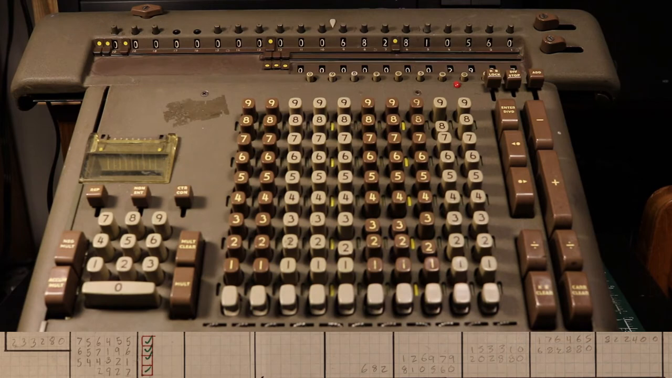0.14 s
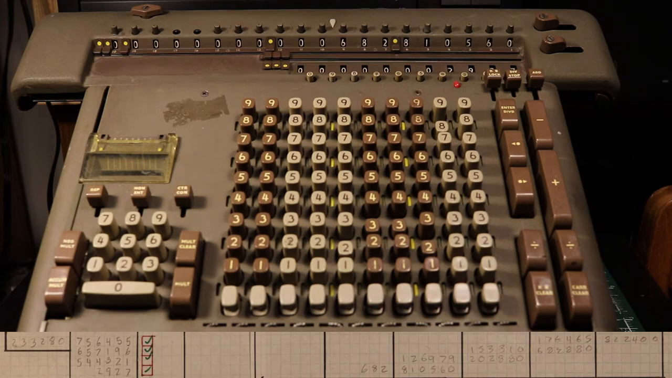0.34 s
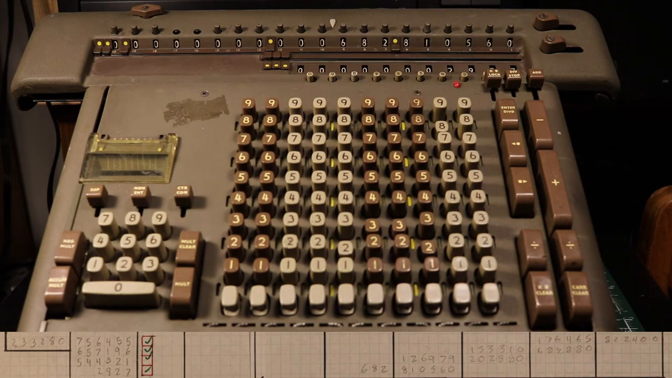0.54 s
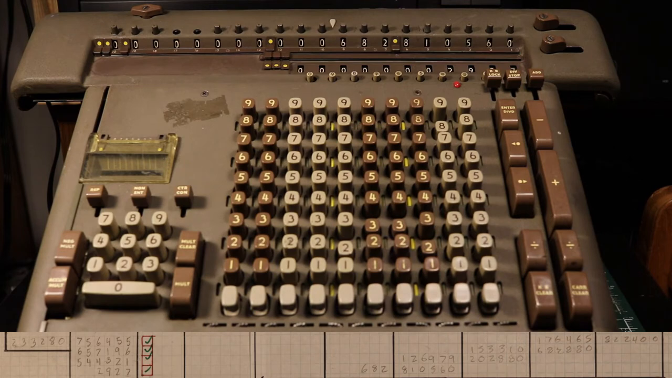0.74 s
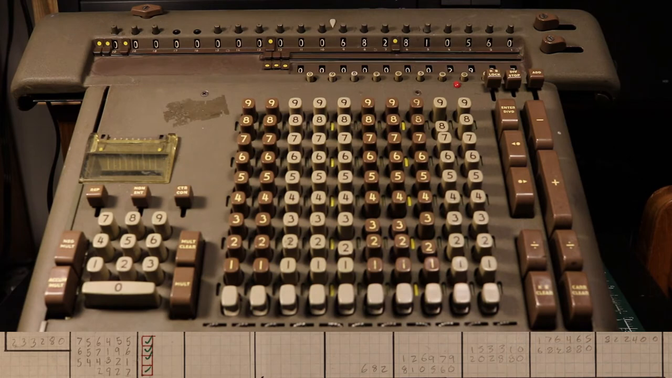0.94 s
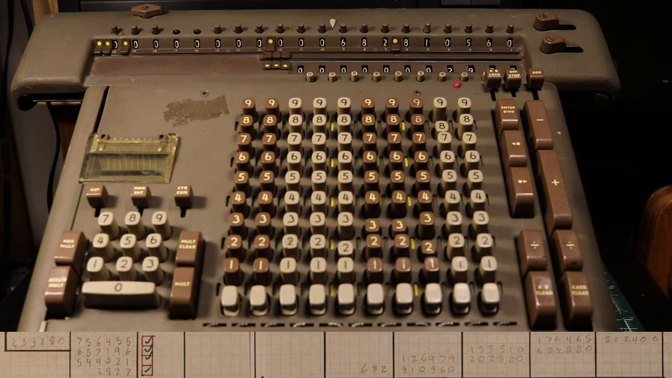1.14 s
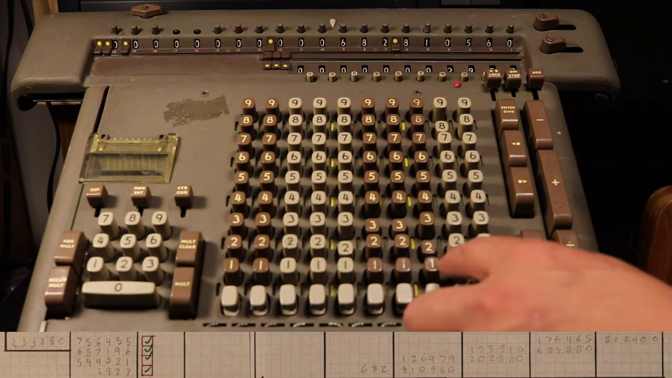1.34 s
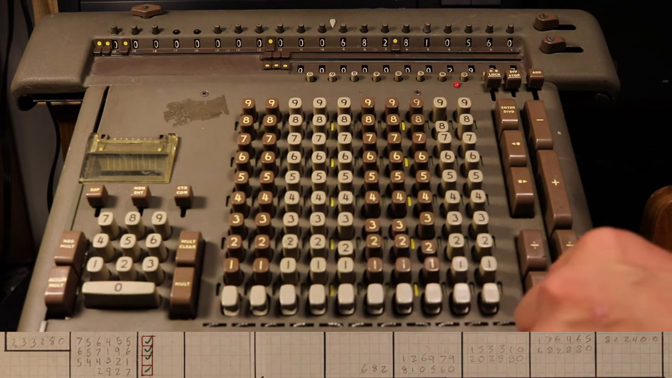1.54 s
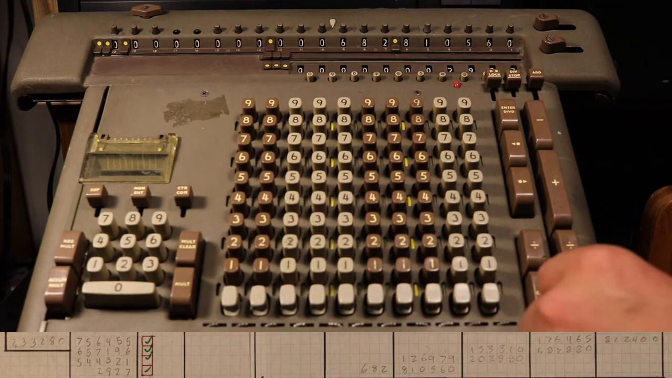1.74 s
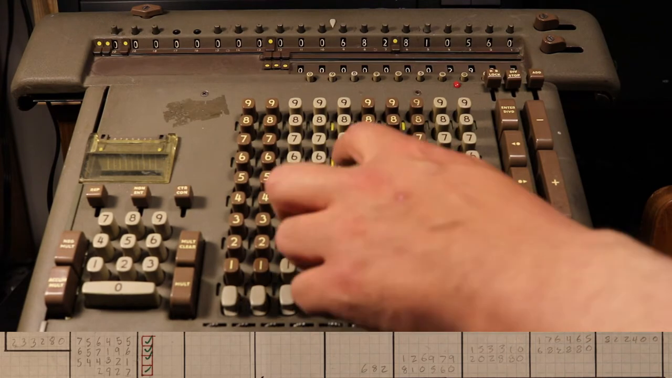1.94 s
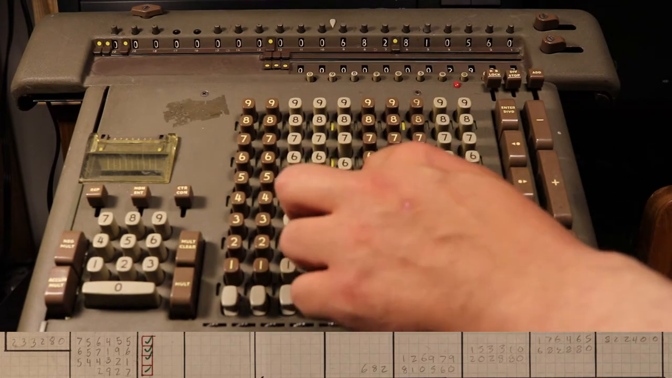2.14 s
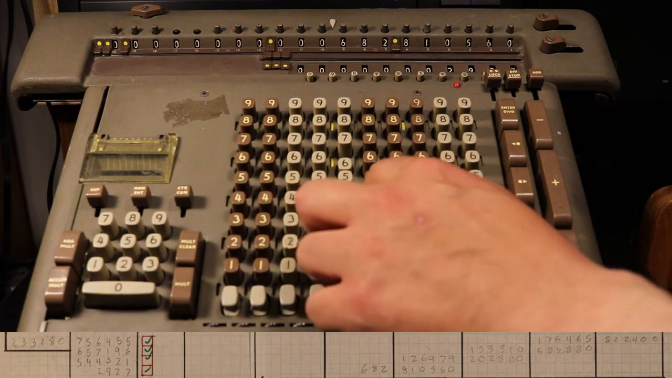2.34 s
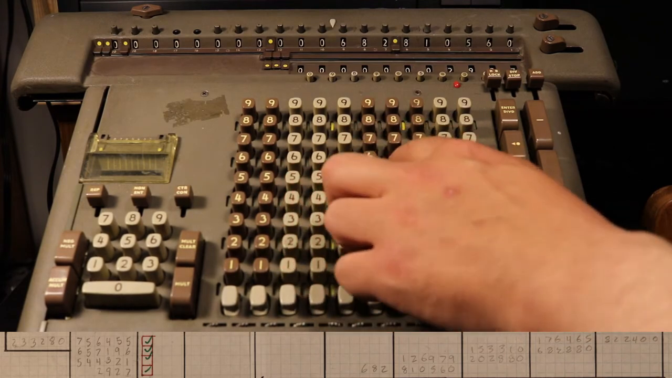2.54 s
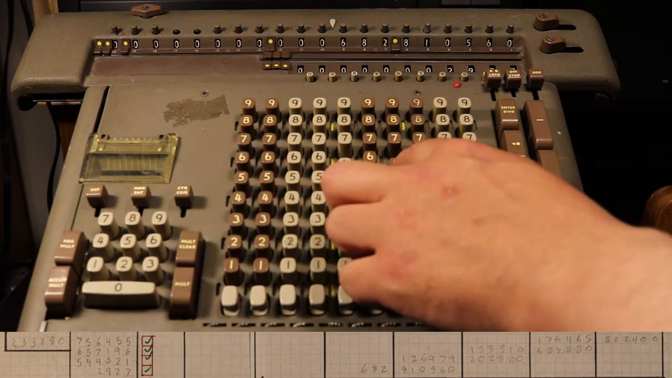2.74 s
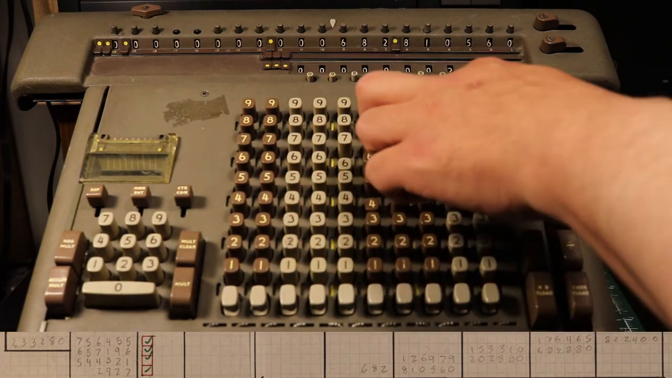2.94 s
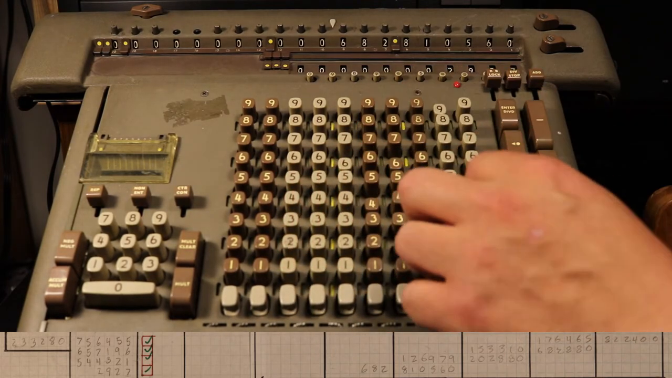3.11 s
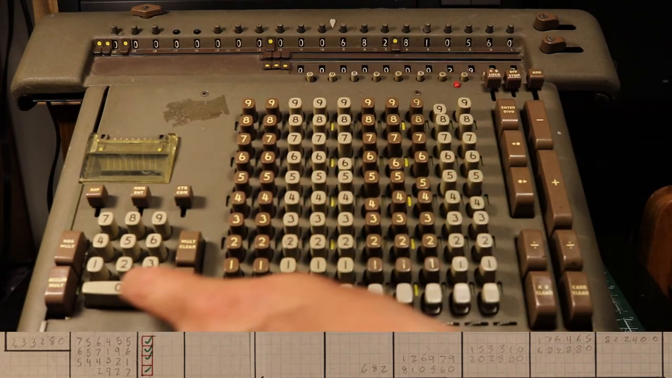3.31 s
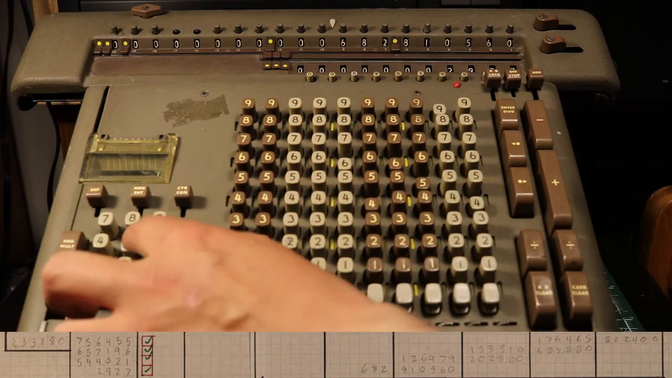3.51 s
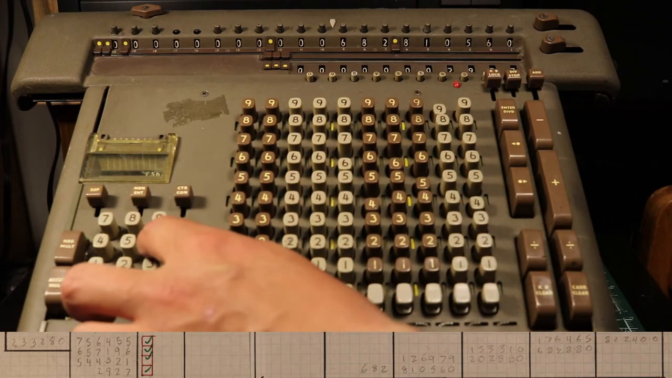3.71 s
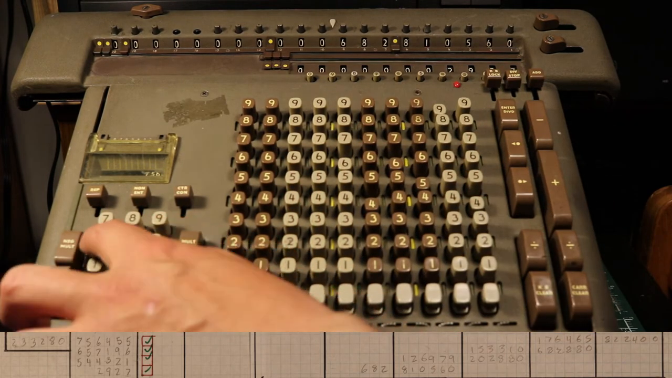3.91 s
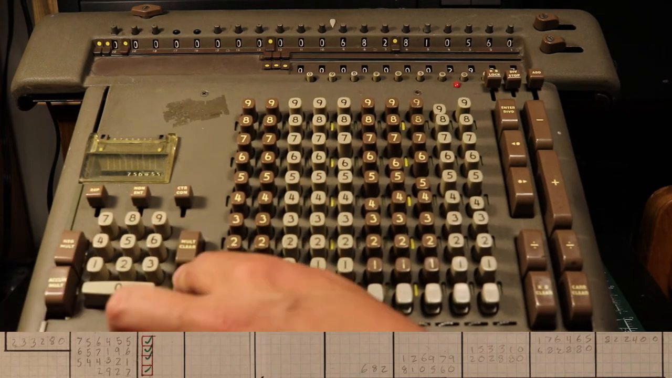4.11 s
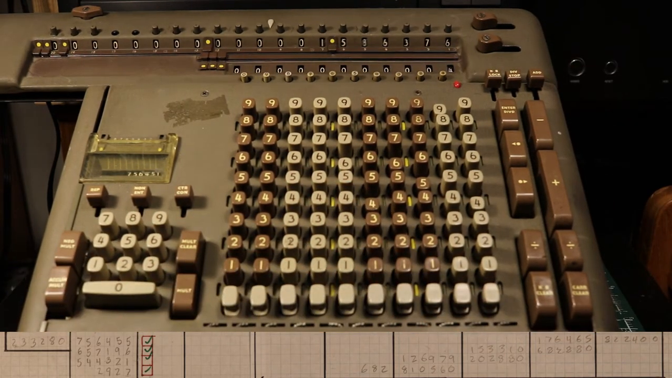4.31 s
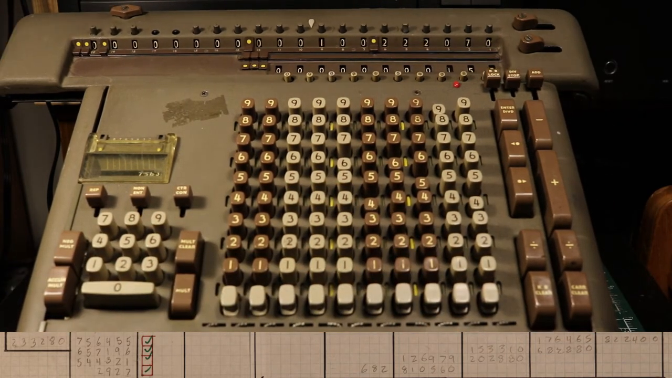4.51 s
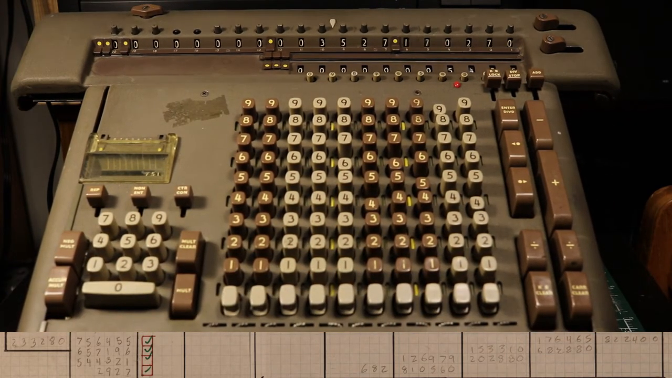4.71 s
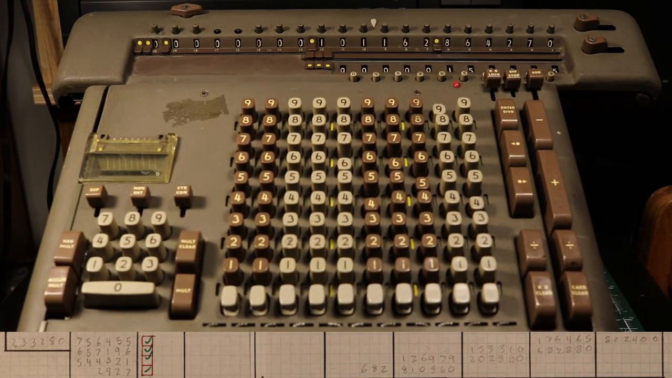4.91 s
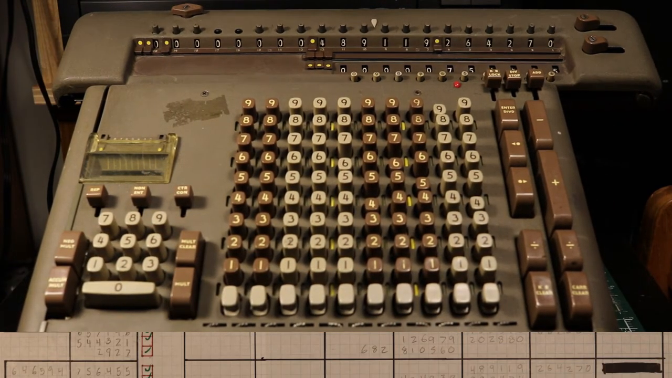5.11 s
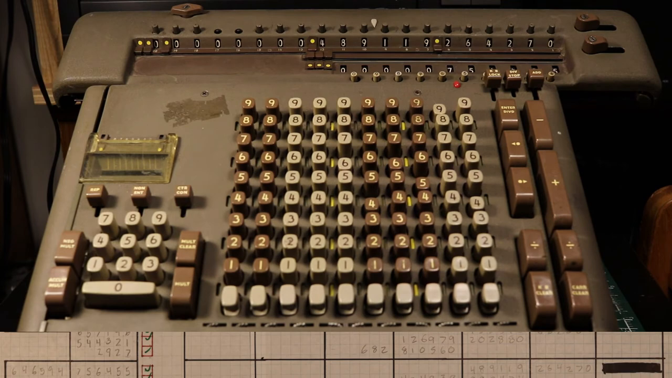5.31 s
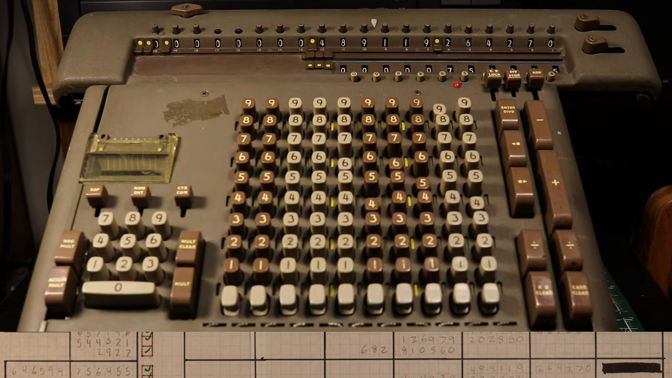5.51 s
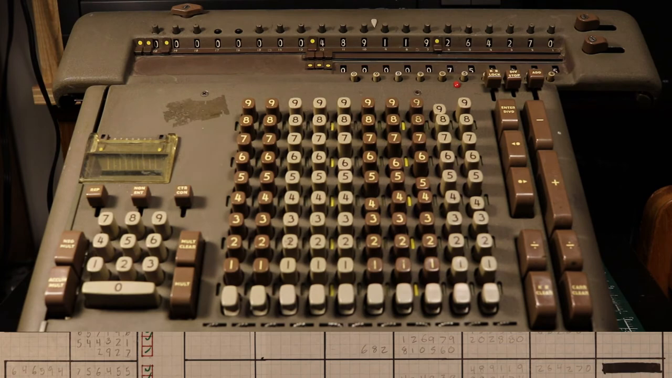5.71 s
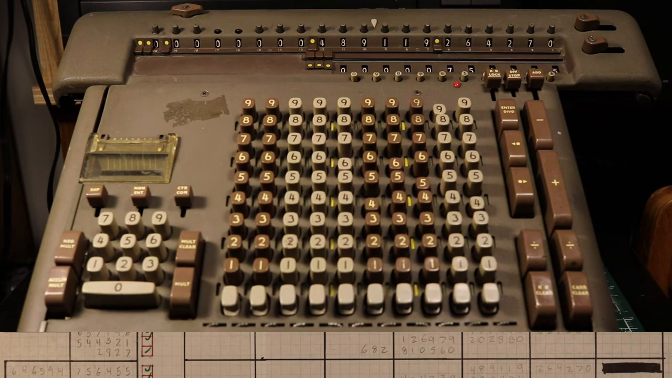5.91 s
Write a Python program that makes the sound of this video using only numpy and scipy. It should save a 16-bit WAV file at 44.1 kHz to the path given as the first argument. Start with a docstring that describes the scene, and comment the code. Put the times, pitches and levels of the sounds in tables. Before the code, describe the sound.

Quiet hum, then a sharp clear-key clack, scattered key clicks and hollow taps, and a one-second loud rattling burst of a motorized mechanical calculator that stops dead.

```python
"""A motor-driven mechanical calculator on a desk, close by: its drive runs for a second, pawls chattering on
every turn, gears whining, while cams throw a round of levers for each digit. Before that a clear key and six
digit keys click and the multiplier pad is tapped six times. Pawls and contacts are impulses and dying noise
shaped by spectra, small steel parts are damped sines, the gears are wavering sines.
A gently wavering hum, low rumble, hiss and faint rustles fill the small room."""
import sys
import numpy as np
from scipy import signal
from scipy.fft import rfft, irfft, next_fast_len
from scipy.io import wavfile
from scipy.ndimage import map_coordinates

SR = 44100
rng = np.random.default_rng(int(sys.argv[2]) if len(sys.argv) > 2 else 0)


def log_audio(samples):
    """Write samples as a 16-bit WAV file to the path given in sys.argv[1]."""
    # one column per channel
    frames = np.atleast_2d(samples).T
    # limit to full scale, then quantise
    limited = np.clip(frames, -1, 1)
    pcm = np.round(limited * 32767).astype(np.int16)
    wavfile.write(sys.argv[1], SR, pcm)


N = 262395

START, STOP = 4.0455, 5.022  # the clutch takes hold and lets go (s)
TURN_HZ = 45.77  # turns of the drive per second
TICK_RING_DB, TICK_HZ = -5, 4150  # light ticks: ring relative to the snap, note

# Levels called nominal below are trimmed where the blows are mixed.
# Keyboard keys, the clear key first. Each row: latching time in seconds, nominal snap, knock and after-ring
# levels in dB, note in Hz, nominal case thump in dB, lead of the finger's touch in seconds,
# delay of the rebound in seconds, rebound level in dB.
KEYS = [(1.543, -18.5, -24, -24.5, 2040, -40, 0.005, 0.027, -30),
        (1.965, -32, -32, -39, 2310, -39.5, 0.0027, .017, -38.5),
        (2.2311, -30.5, -33.5, -41, 3200, -42, .0025, 0.028, -50),
        (2.4103, -36.5, -42.5, -42, 1390, -51, 0.0094, .02, -68),
        (2.7274, -31.5, -31, -43, 2170, -44.5, .0064, .0215, -49),
        (2.8548, -35, -37, -37, 4400, -38.5, 0.011, 0.023, -46),
        (2.9981, -27.5, -32.5, -34, 5230, -40.5, 0.011, .0205, -44)]
# Multiplier keys. Each row: bottoming time in seconds, nominal snap, knock and case thump levels in dB,
# lead of the detent in seconds, detent snap and ring levels in dB, detent note in Hz.
PAD = [(3.399, -25.5, -25.5, -56, 0.025, -33, -33.5, 2080),
       (3.475, -28, -27.5, -50, 0.031, -41, -37.5, 2100), (3.5475, -38, -26, -47, 0.025, -43, -33.5, 1390),
       (3.88, -33, -26.5, -46.5, .0265, -37, -38.5, 2040), (3.9348, -36, -25.5, -49, .0283, -45, -36, 1930),
       (3.9843, -29, -26.5, -49, .028, -38, -38.5, 1450)]
# Damped modes of the case. Each row: frequency in Hz, relative level in dB, 60 dB decay time in seconds.
CASE = [(127, 3, 0.16), (166, -8, 0.4), (236, -4, 0.035)]
# Spectrum of a hard steel snap. Each row: frequency in Hz, relative level in dB.
SNAP = [(1200, -43), (2700, -1), (4300, 0.5), (5100, -3), (5800, 0.5), (6600, -0.5), (9000, -4),
        (16000, -1)]
# Spectrum of a duller knock. Each row: frequency in Hz, relative level in dB.
KNOCK = [(40, -40), (150, -2), (350, -6), (750, -2.5), (2200, -1.5), (3000, -9.5), (5000, -11.5),
         (16000, -61)]
# Spectrum of the linkage ringing after a contact. Each row: frequency in Hz, relative level in dB.
AFTER_RING = [(100, -20), (400, -7), (900, 2), (2000, -1.5), (3200, -3), (6500, -7), (10000, -8.5),
              (16000, -8.5)]


def drive():
    """Periodic excitation: a load that varies with each turn shakes the frame and rattles the pawls; gears whine."""
    # The running drive. Each row: time in seconds, nominal frame level in dB, nominal rattle level in dB.
    drive_levels = [(4.06, -36, -36), (4.066, -30.5, -34), (4.118, -35.5, -35.5), (4.168, -30.5, -30),
                    (4.176, -32.5, -31.5), (4.4, -31, -30.5), (5.004, -32, -31), (5.01, -30, -30)]
    # Gear whine. Each row: frequency in Hz, relative level in dB.
    gears = [(823.6, -7), (1007, -1), (1098.6, -2), (1190, -3.5), (1421, -2.5), (1465, -4), (1512, -7.5),
             (1668, -9.5), (1830, -4.5), (1969, 0), (2063, -5.5), (2198, -5), (2244, -4.5), (2337, -7.5),
             (2428, -4), (2562, -5), (2977, -12)]
    # Spectrum of the frame. Each row: frequency in Hz, relative level in dB.
    frame_spectrum = [(15, -60), (25, -14), (104, -14), (162, -11), (233, -16), (547, -14), (727, -10.5),
                      (805, -6), (873, -9), (1110, -1), (1260, -3), (1480, -2.5), (1600, -6), (2010, -4),
                      (3200, -13), (4160, -10.5), (7040, -120)]
    # Spectrum of the rattle. Each row: frequency in Hz, relative level in dB.
    rattle_spectrum = [(1410, -35.5), (2400, -4), (2790, -8), (3000, -3), (3770, -8.5), (4460, -2.5),
                       (5350, -8.5), (6270, -1.5), (8280, -7.5), (15100, -11), (16000, -27)]
    t = seconds(N)
    level_s, frame_db, rattle_db = np.transpose(drive_levels)
    running = (t > START) & (t < STOP)

    def steady(x):
        """Normalisation: unit deviation while the drive runs."""
        return x / np.std(x[running])

    # the clutch lets go abruptly, and loose parts shiver on for a moment
    after = np.maximum(t - STOP, 0)
    engaging = np.clip((t - START) / 0.0086, 0, 1)
    release = amp(-60 * after / 0.027)
    shiver = amp(-26 - 20 * (after / 0.1) ** 2)
    clutch = engaging * np.maximum(release, shiver)

    # the load peaks once a turn, with a lesser peak half a turn later
    angle = 2 * np.pi * TURN_HZ * (t - 4.0445)
    load = 1.7 * np.cos(angle) + 1.7 * np.cos(2 * angle)
    frame_blows = pawls(jitter=.00008, regular=0.22, t60=0.01, count=16)
    frame = steady(coloured(frame_blows * amp(0.57 * load), frame_spectrum))
    rattle_blows = pawls(jitter=.0005, regular=0.23, t60=0.022, count=24)
    rattle = steady(coloured(rattle_blows * amp(load), rattle_spectrum))

    # the shaft runs ahead and falls behind; backlash roughens each gear
    shaft = t + .00013 * wobble(6)
    whine = np.zeros(N)
    for hz, db in gears:
        strength = amp(db + 2.2 * wobble(12))
        backlash = 0.52 * wobble(40)
        phase = 2 * np.pi * rng.random()
        whine += strength * np.sin(2 * np.pi * hz * shaft + backlash + phase)
    # the whine builds as the gears take up the load
    whine = steady(whine) * amp(-4 * np.exp(-np.maximum(t - START, 0) / 0.088))

    body = amp(np.interp(t, level_s, frame_db)) * (amp(-2.0) * frame + amp(-5.5) * whine)
    return clutch * (body + amp(np.interp(t, level_s, rattle_db) - 1.0) * rattle)


def pawls(jitter, regular, t60, count):
    """Repeated impact: pawls drop at fixed places of each turn, give or take jitter (s), with unequal pushes."""
    out = np.zeros(N)
    turns = np.arange(START - .03, STOP + .3, 1 / TURN_HZ)
    for k in range(count):
        place = (k + rng.random()) / count / TURN_HZ
        times = turns + place + jitter * rng.standard_normal(len(turns))
        pushes = regular + rng.uniform(-0.98, 1, len(turns))
        blows = np.bincount(np.round(times * SR).astype(int), pushes, N)
        # each pawl has a ring of its own
        out += signal.oaconvolve(blows, burst(dying(t60, size=1024)))[:N]
    return out


def levers():
    """Cam timing: the same round of lever impacts recurs for each multiplier digit; latches open and close it."""
    # Levers thrown for every digit. Each row: delay in seconds, nominal snap and clank levels in dB,
    # mean note in Hz.
    cam_levers = [(0, -25, -22, 1528), (0.0197, -20, -22, 2055), (.033, -25, -21.5, 1112),
                  (.057, -25.5, -24, 1945), (0.0772, -29.5, -25, 1160), (.098, -25, -24.5, 1963),
                  (0.1203, -26.5, -25, 1860)]
    # Latches that engage the drive and bring it home. Each row: time in seconds, nominal snap and clank
    # levels in dB, note in Hz.
    latches = [(4.0663, -33, -23, 2130), (4.0808, -33, -22, 1805), (4.1476, -24, -27, 1630),
               (4.152, -20, -21, 2060), (4.1656, -17, -20.5, 1390), (4.942, -31, -27, 1060),
               (4.9631, -22, -24, 1121), (4.972, -19, -24, 1500), (4.9919, -17, -24.5, 1125),
               (5.0098, -16.5, -20.5, 1160), (5.017, -22, -21, 1160)]
    first_digit_s, turns_per_digit = 4.1416, 6
    scatter_s, scatter_db = .0005, 0.8  # from blow to blow
    out = np.zeros(N)
    for digit in range(len(PAD)):
        start = first_digit_s + digit * turns_per_digit / TURN_HZ
        for delay_s, snap_db, clank_db, hz in cam_levers:
            late, force, detune = rng.standard_normal(3)
            blow = amp(scatter_db * force) * slam(snap_db, clank_db, hz * (1 + 0.061 * detune))
            add(out, start + delay_s + scatter_s * late, blow)
    for s, snap_db, clank_db, hz in latches:
        add(out, s, slam(snap_db, clank_db, hz))
    return out


def slam(snap_db, clank_db, hz):
    """Impact excitation: a heavy lever hits its stop with a note of its own."""
    snap = burst(coloured(click(t60=0.013, grit=2.5), SNAP))
    clank = 0.56 * burst(coloured(dying(t60=0.02), KNOCK)) + 0.76 * clink(hz, t60=0.052)
    return amp(snap_db - 3.5) * snap + amp(clank_db - 2) * clank


def carriage():
    """Momentum transfer: the carriage lurches against its rack, shoves the machine and sets the case booming."""
    # Lurches of the carriage. Each row: time in seconds, thud level in dB.
    lurches = [(4.149, -43), (4.299, -44), (4.62, -37), (4.70, -45), (4.812, -44), (4.985, -36.5)]
    thud_spectrum = [(20, 1), (70, 7), (120, -15.0), (260, -1), (500, -4), (1500, -56)]  # (Hz, dB)
    out = np.zeros(N)
    for s, db in lurches:
        thud = burst(coloured(click(t60=0.065, grit=0.56), thud_spectrum))
        add(out, s, amp(db) * thud)
        add(out, s, amp(db - 6) * burst(ringing(CASE)))
    return out


def settling():
    """Restitution: after the stop the linkage bounces back against its rests."""
    # Small rebounds. Each row: time in seconds, level in dB.
    rebounds = [(5.047, -44.5), (5.060, -50), (5.076, -47)]
    out = np.zeros(N)
    for s, db in rebounds:
        add(out, s, amp(db) * burst(coloured(dying(t60=.06), KNOCK)))
    return out


def keys():
    """Successive contacts: each key is touched, slides, latches, bottoms and rebounds; light ticks, singing springs."""
    # Single light ticks of keys and linkage, a clear-key rebound and the clutch tripping.
    # Each row: time in seconds, snap and nominal knock levels in dB.
    light_ticks = [(.8185, -53.5, -56), (1.3952, -50, -42), (1.5622, -34, -33), (2.363, -54, -60),
                   (3.572, -51, -50), (3.778, -45.5, -48.5), (3.9469, -47, -43), (4.0387, -52, -48),
                   (4.0427, -50, -49)]
    # Return springs that sing on after a key. Each row: time in seconds, frequency in Hz, level in dB,
    # 60 dB decay time in seconds.
    key_springs = [(1.544, 1704, -63, 0.55), (3.548, 1365, -70, 0.98)]
    slide_s = .003  # the stem slides this long before the latch
    bottom_s = 0.001326  # from the latch to the bottom
    out = np.zeros(N)
    for s, snap_db, knock_db, ring_db, hz, _, touch_s, rebound_s, rebound_db in KEYS:
        add(out, s - touch_s, tick(snap_db - 16))
        add(out, s - slide_s, tick(snap_db - 20))
        add(out, s, contact(snap_db, knock_db - 3, ring_db - 8.5, hz))
        add(out, s + bottom_s, contact(snap_db - 6.5, knock_db - 3.0, ring_db - 5, hz))
        add(out, s + rebound_s, tick(rebound_db))
    for s, snap_db, knock_db in light_ticks:
        add(out, s, contact(snap_db, knock_db, snap_db + TICK_RING_DB, TICK_HZ))
    for s, hz, db, t60 in key_springs:
        add(out, s, ringing([(hz, db, t60)]))
    return out


def multiplier_pad():
    """Resonant impact: larger keys pass a detent, set pins and bottom with a hollow knock and a buzz of the stem."""
    # Resonances of a multiplier key. Each row: centre in Hz, bandwidth in Hz, relative peak level in dB.
    pad_body = [(710, 130, -3.5), (940, 146, -1), (1170, 146, 0.5), (1370, 290, -0.5), (1660, 122, 6),
                (2140, 340, -5), (2760, 390, -10.5), (3600, 400, -16), (4460, 210, -14.5),
                (5600, 220, -14.5), (6440, 140, -11)]
    # Pins set on the way down. Each row: lead before the bottom in seconds, snap, nominal knock and
    # after-ring levels in dB, note in Hz.
    pin_steps = [(0.0072, -47, -48, -47, 1330), (0.0028, -40, -46, -33.5, 1640)]
    touch_s, touch_db = .0058, -14  # the finger lands this long before the detent, relative to its snap

    def body(f):
        """Modal sum: resonances of alternating sign."""
        total = 0
        for k, (centre, width, db) in enumerate(pad_body):
            resonance = 1j * f * width / (centre * centre - f * f + 1j * f * width)
            total = total + (-1) ** k * amp(db) * resonance
        return total

    out = np.zeros(N)
    for s, snap_db, knock_db, _, detent_s, detent_db, ring_db, hz in PAD:
        add(out, s - detent_s - touch_s, tick(detent_db + touch_db))
        add(out, s - detent_s, contact(detent_db, ring_db - 8.5, ring_db, hz))
        for lead_s, *pin in pin_steps:
            add(out, s - lead_s, contact(*pin))
        knock = burst(filtered(click(t60=0.03, grit=1.0), body))
        add(out, s, amp(knock_db + 0.5) * knock)
        snap_and_buzz = burst(dying(t60=0.0033)) + 0.77 * burst(dying(t60=0.039))
        add(out, s, amp(snap_db - 2) * coloured(snap_and_buzz, SNAP))
    return out


def case():
    """Friction, then modal ringing: a pressed key's stem scrapes down its slot and the heavy case booms faintly."""
    out = np.zeros(N)
    thumps = [(s, db) for s, _, _, _, _, db, *_ in KEYS]
    thumps += [(s, db) for s, _, _, db, *_ in PAD]
    for s, db in thumps:
        # reversed in time, the scrape swells into the click
        swelling = dying(t60=0.018, size=1024)[::-1]
        scrape = burst(coloured(swelling, AFTER_RING))
        add(out, s - len(scrape) / SR, amp(-48) * scrape)
        add(out, s, amp(db - 3.0) * burst(ringing(CASE)))
    return out


def contact(snap_db, knock_db, ring_db, hz):
    """Collision of small parts: a hard snap and a short knock, followed by the ring of the linkage."""
    out = np.zeros(4096)
    add(out, 0, amp(snap_db) * burst(coloured(click(t60=0.0032, grit=1.53), SNAP)))
    add(out, 0.00021, amp(knock_db - 1.0) * burst(coloured(click(t60=0.0031, grit=1.0), KNOCK)))
    ring = 0.81 * burst(coloured(dying(t60=0.036), AFTER_RING)) + 0.59 * clink(hz, t60=0.011)
    add(out, .0005, amp(ring_db) * ring)
    return out


def tick(db):
    """Light collision: a contact whose knock and ring follow its snap level."""
    return contact(db, db - 1, db + TICK_RING_DB, TICK_HZ)


def click(t60, grit):
    """Impulse excitation: one hard impulse and the brief scrape that goes with it."""
    x = grit * burst(dying(t60))
    x[0] += np.sqrt(SR / 1000)  # the energy of a burst in one sample
    return burst(x)


def clink(hz, t60):
    """Bending vibration: the note of one small steel part, with its second mode."""
    t = seconds(size=2048)
    phase = 2 * np.pi * hz * t
    modes = np.sin(phase) + amp(-7.5) * np.sin(2.6 * phase)
    return burst(modes * amp(-60 * t / t60))


def ringing(modes):
    """Modal superposition: the sum of exponentially damped sines."""
    t = seconds(size=32768)
    return sum(amp(db - 60 * t / t60) * np.sin(2 * np.pi * hz * t) for hz, db, t60 in modes)


def dying(t60, size=2048):
    """Dense modes: the ring of a small struck part as noise that decays 60 dB in t60 seconds."""
    return rng.standard_normal(size) * amp(-60 * seconds(size) / t60)


def springs(x):
    """Sympathetic resonance: springs and plates ring with whatever shakes them."""
    # Steel springs and plates. Each row: frequency in Hz, relative level in dB, 60 dB decay time in seconds.
    spring_modes = [(779, -10, 0.18), (930, -17, 0.59), (1107, -7.5, 0.19), (1380, -10, 0.19),
                    (1518, -11, 0.26), (1588, -5, 0.13), (1845, 1, 0.14), (1980, -11, .33),
                    (2051, -13, 0.25), (2410, -3, 0.16), (2650, -5, .14), (2950, -6, .1), (4000, -10, 0.15),
                    (4300, -12, .12), (6380, 5, .1), (7150, 2, .08)]
    ring = ringing(spring_modes)
    return signal.fftconvolve(x, ring)[:N] / np.linalg.norm(ring)


def room(x):
    """Reverberation: a small room's diffuse tail, its treble dying sooner than its middle range."""
    # Decay of the room. Each row: frequency in Hz, 60 dB decay time in seconds.
    decay_times = [(150, 0.16), (1000, 0.27), (3000, 0.13), (7000, 0.12), (15000, 0.14)]
    hz, t, z = signal.stft(rng.standard_normal(SR // 2), SR, nperseg=256)
    decay = amp(-60 * t / along(decay_times, hz)[:, None])
    tail = signal.istft(z * decay, SR, nperseg=256)[1]
    tail *= np.clip(seconds(len(tail)) / 0.0073, 0, 1)  # the reflections build up
    return signal.fftconvolve(x, tail / np.linalg.norm(tail))[:N]


def background():
    """Stationary tones and shaped noise: a wavering hum over low rumble and hiss, with a few faint rustles."""
    # The hum. Each row: frequency in Hz, mean level in dB.
    hum_tones = [(339, -58.5), (800, -79), (670, -84), (2036, -84)]
    # Spectrum of the rumble. Each row: frequency in Hz, relative level in dB.
    rumble_spectrum = [(20, -2.5), (35, -11), (55, -7), (80, 4.5), (110, -8), (165, -5), (240, -11),
                       (400, -11), (600, -27), (1500, -73)]
    # Spectrum of the hiss. Each row: frequency in Hz, relative level in dB.
    air_spectrum = [(260, -30), (450, -6), (530, -6), (654, -5), (782, -5), (1120, -5.5), (1730, -10),
                    (3230, -13), (4560, -14), (15100, -19), (16000, -25)]
    # Faint rustles. Each row: centre in seconds, half-width of the swell in seconds, level in dB.
    rustles = [(0.056, 0.0076, -63.5), (0.196, 0.028, -62), (0.69, 0.065, -68.5), (0.773, 0.013, -68),
               (5.58, .05, -73.5), (5.706, 0.057, -67), (5.916, 0.011, -67)]
    t = seconds(N)
    hum = np.zeros(N)
    for hz, db in hum_tones:
        hum += amp(db + 1.3 * wobble(3.84)) * np.sin(2 * np.pi * hz * t + .15 * wobble(3.6))
    rumble = amp(-69 + 1.7 * wobble(5.3)) * unit(coloured(rng.standard_normal(N), rumble_spectrum))
    air = amp(-70.0) * unit(coloured(rng.standard_normal(N), air_spectrum))
    swell = sum(amp(db) * np.exp(-2 * ((t - s) / width) ** 2) for s, width, db in rustles)
    rustling = coloured(rng.standard_normal(N), [(400, -3), (2000, 3.5), (15000, 1)])  # (Hz, dB)
    rustle = swell * unit(amp(4.9 * wobble(300)) * rustling)
    return hum + rumble + air + rustle


def amp(db):
    """Logarithmic level: decibels to gain."""
    return 10 ** (np.asarray(db) / 20)


def unit(x):
    """Mean power: scaled to rms 1."""
    return x / np.sqrt(np.mean(x ** 2) + 1e-20)


def burst(x):
    """Impact energy: scaled to that of one millisecond at rms 1."""
    return x * np.sqrt(SR / 1000 / (np.sum(x ** 2) + 1e-20))


def seconds(size):
    """Sampling: a time axis."""
    return np.arange(size) / SR


def along(points, hz):
    """Logarithmic pitch: (Hz, value) points interpolated on a log axis."""
    f, v = np.transpose(points)
    return np.interp(np.log(hz + 1), np.log(f + 1), v)


def wobble(rate):
    """Slow modulation: a smooth random curve, rate knots a second."""
    return map_coordinates(rng.standard_normal(int(N * rate / SR) + 4), [seconds(N) * rate])


def filtered(x, response):
    """Linear filtering: the spectrum of x times a response of frequency."""
    m = next_fast_len(len(x) + 8192)
    return irfft(rfft(x, m) * response(np.fft.rfftfreq(m, 1 / SR)), m)[:len(x)]


def coloured(x, points, size=8192):
    """Minimum phase: x through a causal filter with the given spectrum."""
    gain = amp(along(points, np.fft.rfftfreq(size, 1 / SR)))
    cepstrum = irfft(np.log(gain + 1e-6))
    # folding the cepstrum onto positive times makes the filter causal
    cepstrum[1:size // 2] *= 2
    cepstrum[size // 2 + 1:] = 0
    return signal.fftconvolve(x, irfft(np.exp(rfft(cepstrum))))[:len(x)]


def add(track, s, x):
    """Superposition: mixes x in at time s."""
    part = track[round(s * SR):][:len(x)]
    part += x[:len(part)]


def scene():
    """Superposition: direct sound, sympathetic ringing and reverberation of the calculator, and the background."""
    works = drive() + levers() + carriage() + settling()
    keyboard = keys() + multiplier_pad() + case()
    machine = keyboard + works + amp(-22.5) * springs(works) + amp(-34) * springs(keyboard)
    reverberation = amp(-18.0) * room(works) + amp(-25.0) * room(keyboard)
    return (machine + reverberation + background())[None]


def record(dry):
    """Band limiting: the recorder's gain falls to zero across 500 Hz centred on its band limit."""
    limit_hz = 16150

    def response(hz):
        """Low-pass filtering: a squared linear slope."""
        return np.clip((limit_hz - hz) / 500 + .5, 0, 1) ** 2

    return filtered(dry[0], response)[None]


dry = scene()
out = record(dry)
log_audio(out)
```